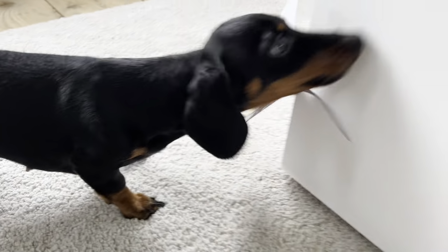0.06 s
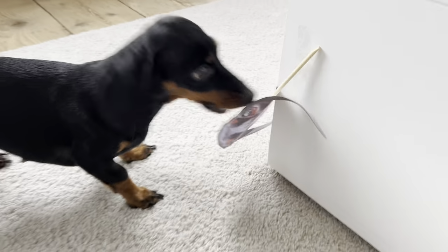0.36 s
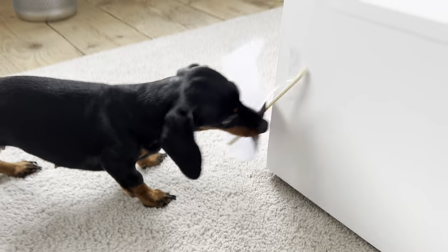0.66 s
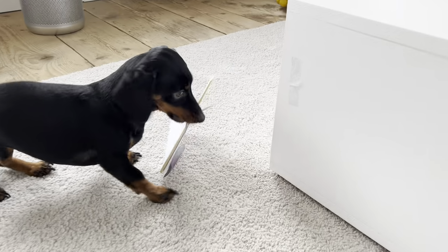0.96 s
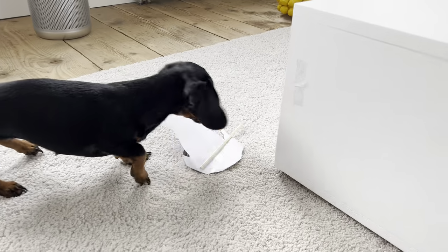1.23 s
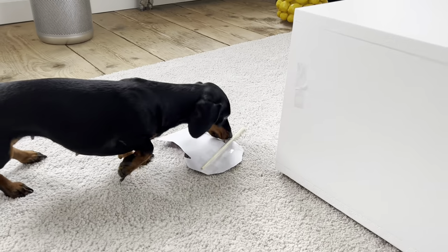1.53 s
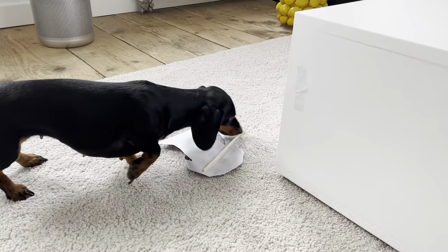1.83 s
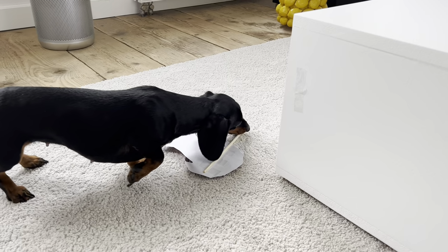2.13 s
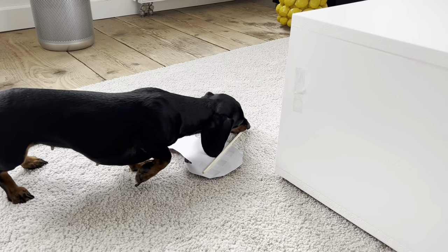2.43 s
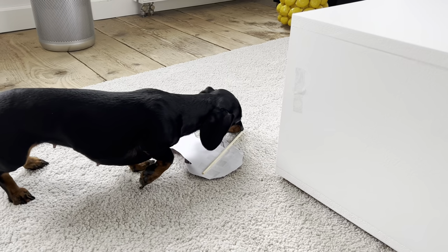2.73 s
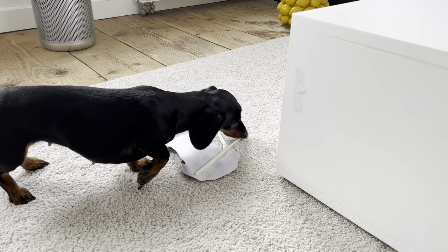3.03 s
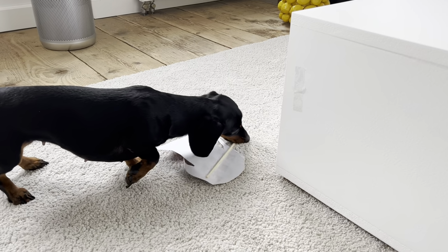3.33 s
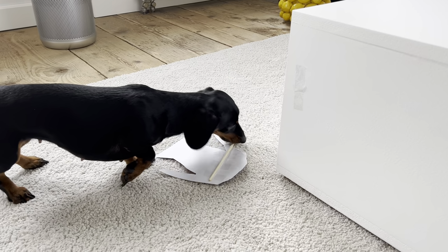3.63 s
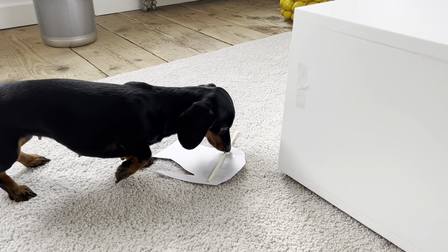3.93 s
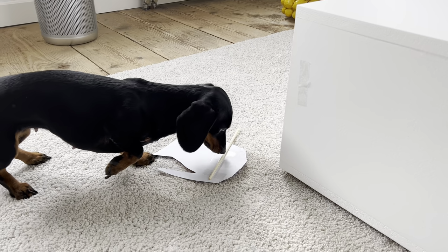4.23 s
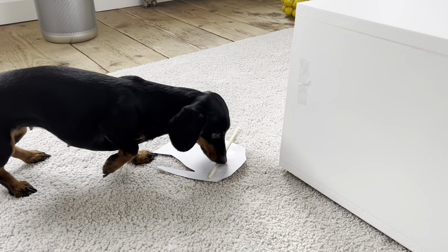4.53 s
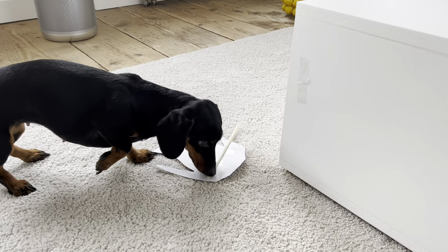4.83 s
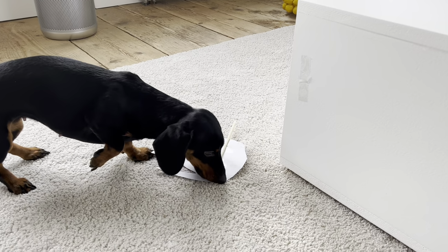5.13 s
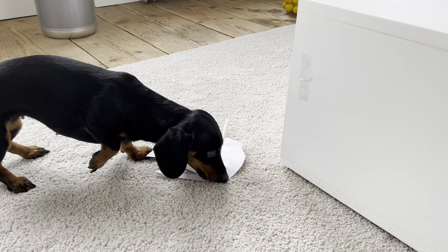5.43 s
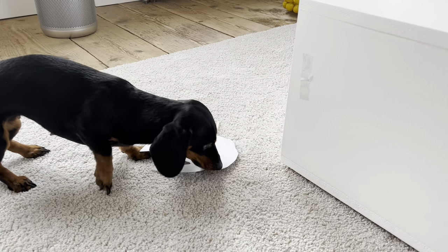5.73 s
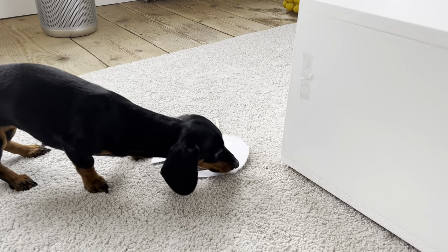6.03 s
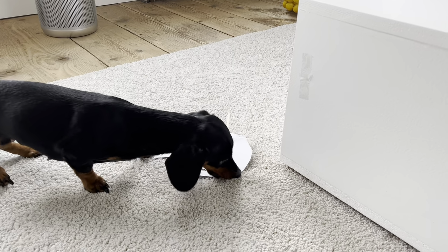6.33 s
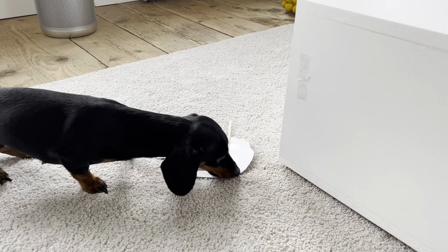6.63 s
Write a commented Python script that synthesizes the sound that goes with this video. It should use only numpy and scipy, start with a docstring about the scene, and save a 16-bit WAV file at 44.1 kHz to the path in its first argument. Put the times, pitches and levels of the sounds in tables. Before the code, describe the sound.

A small dog tugs at a sheet of paper, heard close in a quiet furnished room with a short echo. Paper crinkles and pops from the start, and a dull paw thud lands at about 0.4 seconds. Crackling builds into a short, crisp rip at 0.7 seconds as the sheet comes off a cabinet, with sharp snaps just after. From 1 to 2 seconds the paper flaps and rustles over soft steps on a rug and low shuffling, while claws or teeth tick on the left. Quieter, uneven rustling follows as the dog mouths the sheet, with hollow pops between 3.1 and 3.5 seconds. After a lull, soft nuzzling strokes return around 4.4 to 5.2 seconds, with a few light steps. A tiny tooth click and two louder pops come around 5.4 to 5.7 seconds. Faint rustles and small pops continue until nearly 7 seconds.

```python
"""A small dog steals a sheet of paper

The dog rips the sheet off a cabinet with its teeth, carries it onto a rug and mouths it.
Fibres tear, creases snap, and the paper buckles with hollow pops between the jaws.
It rustles as it flaps, slides and rubs against the muzzle. Claws or teeth tick on the left.
Paws thud on the covered floorboards, and the furnished room adds a short echo."""
import sys
import numpy as np
from scipy import signal
from scipy.fft import rfft, irfft, next_fast_len
from scipy.io import wavfile
from scipy.ndimage import uniform_filter1d, map_coordinates

SR = 44100
rng = np.random.default_rng(int(sys.argv[2]) if len(sys.argv) > 2 else 0)


def file_out(sig):
    """Save sig as 16-bit WAV at sys.argv[1]."""
    # one column per channel
    cols = np.atleast_2d(sig).T
    # limit, then scale
    lim = np.clip(cols, -1, 1)
    pcm = np.round(lim * 32767).astype(np.int16)
    wavfile.write(sys.argv[1], SR, pcm)


N = 302702

# tone colours, or how strong each frequency is: f/Hz, gain/dB
QUIET_COLOUR = [(20, -24.5), (40, -2), (60, -1.5), (105, 0), (160, -13), (340, -11.5), (850, -26),
                (2200, -25), (4000, -40.5), (9000, -34), (10000, -38), (15000, -35.5)]  # the still room
RUMBLE_COLOUR = [(22, -50.5), (40, -13.5), (62, -8.5), (105, 0), (150, -5.5), (220, -11.5), (330, -20),
                 (700, -62.5)]  # the moving dog
BODY_COLOUR = [(110, -37), (220, -2.5), (340, -2), (600, -4.5), (850, -7.5), (1500, -44)]  # low part of the rustle
SHEET_COLOUR = [(400, -36.5), (750, -7.5), (1200, -2.5), (2000, -4.5), (2900, -9), (4500, -18), (8000, -50)]  # middle part of the rustle
HISS_COLOUR = [(1600, -29), (3000, 3), (4200, 3.5), (6200, 6), (7800, 4), (9300, -2), (9900, -14.5),
               (16000, -23.5)]  # high part of the rustle
TEAR_COLOUR = [(300, -16.5), (1000, -12.5), (3000, -0.5), (5000, 3.5), (9000, 3), (12000, 2.5), (16000, 2)]  # breaking fibres
TOP_END_COLOUR = [(9500, -1), (10100, -20.5), (12500, -14), (14000, -15.5), (15200, -8)]  # the treble drops steeply above 9.5 kHz
# how alike the left and right sides are (1 is the same): f/Hz, likeness
STEREO_LIKENESS = [(60, 1), (150, 0.9), (350, 0.7), (900, -0.093), (2500, 0.22), (5000, 0.32),
                   (9000, 0.092)]
# how much louder the left side is: f/Hz, lean/dB
STEREO_LEAN = [(100, 0.2), (600, 1.5), (1200, 0), (2500, 3.5), (4500, 9), (9000, 2.5)]
# only a snap's treble is shaded on the far side: f/Hz, share of the snap's lean
SNAP_SHADOW = [(2200, 0), (4000, 0.75)]
# the room's echo (t60 is the time to fade by 60 dB): f/Hz, t60/s
ROOM_DECAY = [(150, 0.53), (1000, 0.53), (4000, 0.33), (10000, 0.076)]
# the dog shifting its weight and the sheet wagging: t/s, relative level/dB
SHUFFLE_LEVELS = [(0.0, -60), (0.25, -59), (0.4, -56), (0.52, -53), (0.95, -60.5), (1.18, -56.5),
                  (1.58, -53), (1.99, -55.5), (2.1, -62.5), (2.37, -73), (2.65, -70), (3.15, -69),
                  (3.61, -76), (5.04, -76), (5.25, -61), (5.4, -74), (5.62, -69.5), (6.08, -75),
                  (6.55, -76.5), (6.86, -80)]
# soft thuds of paws and body: t/s, level/dB, f/Hz, length/s
PAW_THUDS = [(0.038, -42.5, 176, 0.02), (0.202, -31.5, 270.7, 0.009), (0.228, -42.5, 146, 0.045),
             (0.356, -40.5, 105, 0.059), (0.431, -23, 105, 0.063), (0.43, -30.5, 177, 0.031),
             (0.488, -28, 323, 0.016), (0.495, -33.5, 107, 0.026), (0.668, -35.5, 322, 0.012),
             (0.878, -41, 97, 0.042), (1.03, -50, 182, 0.022), (1.145, -38.5, 118, 0.022),
             (1.426, -38, 91, 0.041), (1.533, -40, 81, 0.057), (1.591, -34.5, 85.5, 0.046),
             (1.663, -37, 114, 0.017), (1.707, -39.5, 112, 0.055), (1.82, -42.5, 187, 0.034),
             (1.965, -44, 171, 0.039), (2.052, -49, 188, 0.038), (2.551, -51, 105, 0.063),
             (2.631, -51.5, 110, 0.05), (3.165, -53, 106, 0.04), (5.071, -40, 251, 0.034),
             (5.092, -59, 232, 0.059), (5.098, -51.5, 336, 0.029), (5.222, -48.5, 119, 0.081),
             (5.638, -52, 306, 0.045), (5.88, -48, 113, 0.039), (6.197, -61.5, 229, 0.033),
             (6.624, -64, 280, 0.019)]
# a click of teeth: t/s, level/dB, f/Hz, t60/s
TOOTH_CLICKS = [(5.4138, -42.5, 5730, 0.0036)]
# faint rustle of the sheet, never quite still between strokes: t/s, level/dB
HANDLING_LEVELS = [(0.0, -57), (0.4, -63.5), (0.53, -59.5), (0.69, -54.5), (0.78, -53), (1.22, -55.5),
                   (3.04, -73.5), (3.32, -64), (3.48, -81), (3.88, -83.5), (4.45, -88.5), (4.57, -77),
                   (5.1, -66), (5.33, -89.5), (5.5, -69.5), (5.64, -65.5), (5.79, -75.5), (6.42, -81.5),
                   (6.86, -88.5)]
# strokes of the sheet flapping, sliding or being nuzzled: t/s, rise/s, hold/s, relative level/dB,
# body boost/dB, hiss boost/dB, air boost on top of the hiss boost/dB, fade/(dB/s)
PAPER_STROKES = [(0.036, 0.0032, 0.0095, -46.5, -6.5, -9.5, 2, 186),
                 (0.144, 0.033, 0.03, -60, 2.5, 1, 5.5, 137), (0.215, 0.0073, 0.032, -56, 6.5, -16, 0, 138),
                 (0.243, 0.06, 0.025, -49.5, -5, -7, 3.5, 480),
                 (0.481, 0.0035, 0.27, -53.5, -4, -5.5, 6, 133),
                 (0.61, 0.034, .03, -47.5, -3.5, -3, 4.5, 128), (0.7, .005, 0.01, -43.5, -2.5, 2.5, 5, 120),
                 (0.793, .015, .01, -50.5, 4.5, -18, 0, 196),
                 (0.853, 0.0036, .013, -47.5, 2.5, 4.5, 4.5, 113),
                 (1.011, 0.011, 0.0061, -44, -6.5, 0.5, 0, 143), (1.151, 0.039, 0.013, -54, -2, 4, 2, 298),
                 (1.21, 0.0061, .0054, -52.5, 6, -2, -2, 224), (1.455, .022, 0.1, -57.5, -11, 4.5, -9, 132),
                 (1.726, .016, .018, -60, -1, 2.5, -8, 120), (1.811, .012, 0.034, -53.5, 1.5, -1, -3, 93),
                 (1.968, 0.015, 0.083, -65, 0.5, 7, -1, 113), (2.134, 0.048, 0.085, -63, 1, 0.5, -2.5, 79),
                 (2.349, 0.031, 0.036, -65, 7, -2, 0, 100), (2.467, 0.02, 0.017, -64, 1, 7, -7, 113),
                 (2.618, 0.024, .015, -66.5, 5.5, -2, 3, 167),
                 (2.748, .0084, 0.06, -66, -16, 3.5, -7.5, 139),
                 (2.944, 0.048, 0.012, -68.5, -16, 5, 0, 226), (3.128, .019, 0.031, -62, -6.5, -1, -13, 92),
                 (3.222, 0.17, .024, -63, -6, 0, 2.5, 187),
                 (3.546, 0.029, 0.049, -80.5, 9, -11.5, 15, 128.5),
                 (3.722, 0.06, 0.035, -65, -6, 4, 1, 476), (4.126, .027, 0.024, -77.5, -8, -8, -8, 218.5),
                 (4.376, 0.033, 0.054, -69.5, -10, 3.5, 1.5, 158.5),
                 (4.52, .016, 0.012, -72, -8, -.5, -17, 87), (4.695, .012, .02, -69.5, -1.5, 4, 1, 115),
                 (4.827, 0.037, 0.017, -59, -6, -7, -21, 157),
                 (4.949, 0.018, 0.039, -63, -8.5, 2, 0.5, 130),
                 (5.103, .012, 0.1, -67, -12, 4.5, -3.5, 132),
                 (5.18, 0.053, 0.048, -63.5, 2.5, -6.5, 3, 108),
                 (5.59, 0.028, 0.018, -55, -17, 3.5, 2.5, 161), (5.857, .029, .014, -71, 5, -12, 2, 122),
                 (6.072, 0.023, .0064, -71, -2, 3.5, 5.5, 303),
                 (6.19, 0.031, 0.024, -79, 4.5, 3, 3.5, 135.5),
                 (6.52, 0.082, 0.036, -69, 0, 1, -2.5, 156.5),
                 (6.758, 0.026, 0.016, -75.5, -16, 7.5, -11, 131)]
# the modes (natural tones) of a buckling patch of paper: multiple of the pop's f, level/dB
PANEL_MODES = [(0.55, 4.5), (0.78, 11.5), (1.06, 15.5), (1.6, 3.5), (2.1, 11.5), (2.5, 10.5)]
# hollow pops between the jaws: t/s, level/dB, f/Hz, t60 at f/s, crack level/dB, shiver over pop/dB
BUCKLE_POPS = [(0.0388, -39, 1650, .022, -52, -11), (0.1174, -42, 1400, .026, -53, -22),
               (0.2254, -33, 1080, .027, -46, -22), (0.7967, -38.5, 1450, .01, -48, -14),
               (0.8138, -43, 1500, .01, -55, -12), (1.2212, -43.5, 1550, .014, -52, -12),
               (1.2318, -44.5, 1300, .01, -56, -12), (3.1186, -42, 1340, .022, -54, -14),
               (3.1555, -56, 1500, .012, -60, -14), (3.1599, -53.5, 1400, .012, -56, -14),
               (3.2618, -45, 820, .004, -48, -24), (3.2632, -49, 1350, .005, -53, -20),
               (3.4451, -56, 2300, .018, -68, -16), (3.4548, -51, 1450, .018, -68, -17),
               (5.4572, -38.5, 930, .012, -57, -12), (5.468, -47, 1500, .012, -63, -12),
               (5.478, -52, 2050, .01, -66, -12), (5.6469, -32.5, 930, .012, -53, -13),
               (5.6625, -46, 1500, .012, -60, -12), (6.0095, -53.5, 1250, .014, -55, -20),
               (6.1844, -63.5, 850, .03, -79, -12), (6.198, -65, 950, .015, -76, -12),
               (6.3565, -60.5, 1030, .012, -64, -13), (6.3697, -64, 1020, .013, -70, -12),
               (6.6056, -48, 900, .017, -58, -11), (6.645, -58, 950, .016, -66, -12)]
# sharp snaps and ticks: paper creases, and dry claw or tooth ticks on the left:
# t/s, relative level/dB, f/Hz, t60/s, sharpness Q, top octave/dB, lean/dB
SNAPS_AND_TICKS = [(0.0386, -38, 3900, .018, 1.1, -10, 2), (0.1168, -44.5, 5500, .018, .8, 3, 3),
                   (0.2004, -41.5, 3000, .018, .5, -3, 5), (0.2253, -34, 2500, .011, 1, -13, 3),
                   (0.4895, -49, 4500, .028, 1, -8, 6), (0.5768, -38, 10000, .012, .6, 6, 6),
                   (0.5992, -33.5, 3200, .011, .9, 3, 4), (0.6481, -32, 5100, .011, 1.2, -5, 7),
                   (0.6629, -31, 3100, .014, 1.1, -3, 7), (0.6745, -41, 4300, .009, 1, -3, 3),
                   (0.6886, -29.5, 8800, .011, 1, 10, 4), (0.6895, -37, 5000, .008, 2, -3, 5),
                   (0.7062, -37, 6500, .005, 1, 2, 5), (0.7098, -33, 6300, .018, 1, 2, 6),
                   (0.7198, -35.5, 7200, .008, 1.2, 0, 4), (0.7242, -31.5, 8000, .01, 1.3, 0, 4),
                   (0.7299, -24.5, 4200, .008, 1.8, 6, 2), (0.7305, -22, 6000, .007, 1.3, 10, 5),
                   (0.8574, -24.5, 6200, .011, .7, 7, 5), (0.8599, -24, 8000, .011, .9, 4, 1),
                   (0.8715, -35.5, 6500, .018, .9, 5, 2), (0.9523, -34, 6600, .016, 1, -1, 7),
                   (0.9695, -42.5, 5500, .022, .8, -10, 6), (0.9956, -41.5, 5300, .016, 1.2, -6, 10),
                   (1.0245, -40, 8000, .02, 1.3, -10, 6), (1.0275, -31.5, 7600, .045, 1.8, -10, 6),
                   (1.1324, -38, 6000, .018, 1.2, -1, 8), (1.1892, -44, 3600, .014, 1.8, -10, 5),
                   (1.3114, -38, 5900, .026, 1.9, -25, 15), (1.386, -44.5, 5800, .016, 1.8, -25, 14),
                   (1.4076, -46.5, 5700, .014, 1.7, -25, 13), (1.4765, -48, 5700, .02, 1.7, -25, 12),
                   (1.4818, -44, 5800, .022, 1.8, -25, 15), (1.5425, -51.5, 5000, .01, 2.5, -25, 12),
                   (1.5595, -51, 6500, .012, 1.5, -20, 10), (1.656, -55.5, 6000, .012, 2, -25, 10),
                   (1.7251, -47.5, 6000, .015, 2, -25, 16), (1.7405, -55, 6200, .012, 2, -25, 12),
                   (1.8103, -51, 5300, .01, 1, -20, 15), (1.8925, -53, 3500, .012, 1, -20, 6),
                   (1.9149, -52, 3000, .014, 1.2, -20, 6), (1.978, -54.5, 6300, .015, 1.5, -20, 12),
                   (1.9903, -51, 6450, .022, 2.2, -25, 12), (2.2315, -60, 6300, .014, 1.3, -20, 8),
                   (2.365, -61, 5200, .025, 1.8, -20, 8), (2.4732, -57.5, 6480, .016, 2, -20, 8),
                   (2.7525, -61, 3600, .014, 1.2, -20, 6)]
# fibres parting as the sheet comes off: t/s, level/dB
RIP_LEVELS = [(0.62, -69), (0.706, -55), (0.717, -34.5), (0.726, -38.5), (0.738, -46.5), (0.76, -61.5),
              (0.80, -120)]


def amp(db):
    """Turn decibels into a gain to multiply by."""
    return 10 ** (np.asarray(db) / 20)


def unit(x):
    """Scale x to an average strength (rms) of 1."""
    return x / np.sqrt(np.mean(x ** 2) + 1e-20)


def unit_hit(x):
    """Scale x so that its loudest two milliseconds have rms 1."""
    power = uniform_filter1d(np.atleast_2d(x) ** 2, size=88, axis=-1).mean(0)
    return x / np.sqrt(power.max())


def along(points, hz):
    """Read a (frequency, value) table at hz, on a log frequency scale."""
    f, values = np.transpose(points)
    return np.interp(np.log(hz + 1), np.log(f + 1), values)


def timeline(points):
    """Join (time, value) points into one value per sample."""
    return np.interp(np.arange(N) / SR, *np.transpose(points))


def wobble(rate):
    """A smooth random curve through `rate` points a second."""
    return map_coordinates(rng.standard_normal(int(N * rate / SR) + 4), [np.arange(N) * rate / SR])


def filtered(x, response):
    """Give each frequency in x the gain that response(hz) asks for."""
    n = x.shape[-1]
    padded = next_fast_len(n + 4096)
    return irfft(rfft(x, padded) * response(np.fft.rfftfreq(padded, 1 / SR)), padded)[..., :n]


def resonate(x, hz, q):
    """Pass x through one resonance; a higher q makes it narrower."""
    return filtered(x, lambda f: 1j * f * hz / q / (hz * hz - f * f + 1j * f * hz / q))


def add(track, start, sound, pan_db=0):
    """Mix a sound into a stereo track at `start` seconds; positive pan_db leans left."""
    part = track[:, max(round(start * SR), 0):][:, :sound.shape[-1]]
    part += (sound * amp([[pan_db / 2], [-pan_db / 2]]))[:, :part.shape[1]]


def spread(pair, colour):
    """Blend two unrelated signals into one coloured stereo sound of rms 1, near mono in the bass."""
    def blend(hz):
        angle = np.arccos(np.clip(along(STEREO_LIKENESS, hz), -1, 1)) / 2
        return amp(along(colour, hz)) * [np.cos(angle), np.sin(angle)]
    mid, side = filtered(pair, blend)
    stereo = np.array([mid + side, mid - side])
    return unit(filtered(stereo, lambda hz: amp(np.outer([.5, -.5], along(STEREO_LEAN, hz)))))


def background():
    """The faint, steady noise of the room."""
    return amp(-73.5) * spread(rng.standard_normal((2, N)), QUIET_COLOUR)


def room_echo(x):
    """The walls return a blurred echo whose high notes die first."""
    hz, t, noise = signal.stft(rng.standard_normal((2, SR // 2)), SR, nperseg=256)
    tail = signal.istft(noise * amp(-60 * t / along(ROOM_DECAY, hz)[:, None]), SR, nperseg=256)[1]
    tail = np.pad(tail / np.linalg.norm(tail[0]), ((0, 0), (int(0.005 * SR), 0)))
    return signal.fftconvolve(x.mean(0)[None], tail, axes=1)[:, :N]


def with_reflections(x, strength):
    """The cabinet and nearby walls add a few weak copies of x within about 30 ms."""
    paths = np.zeros((2, SR // 32))
    paths[:, 0] = 1  # the direct sound
    for side in paths:
        side[rng.integers(SR // 400, len(side), size=10)] = strength * rng.uniform(-1.0, 1, size=10)
    return signal.fftconvolve(x, paths / np.linalg.norm(paths, axis=1, keepdims=True), axes=1)[:, :N]


def shuffle():
    """The moving dog and the wagging sheet make a low, uneven rumble."""
    level_db = timeline(SHUFFLE_LEVELS) + 4 + 2.6 * wobble(rate=22)
    return amp(level_db) * spread(rng.standard_normal((2, N)), RUMBLE_COLOUR)


def thuds():
    """Each padded contact swells for a few cycles of a low tone, then scuffs on the rug."""
    out, t = np.zeros((2, N)), np.arange(SR // 5) / SR
    for start, db, hz, length in PAW_THUDS:
        progress = np.minimum(t / length, 1)
        push = np.sin(np.pi * progress) ** 2 * np.sin(2 * np.pi * hz * t)
        dull_hz = min(hz, 150)  # the scuff stays dull however high the thud
        drag = resonate(rng.standard_normal(len(t)), 1.7 * dull_hz, q=1.9)
        drag = unit(resonate(drag, 1.4 * dull_hz, q=0.95))
        scuff = drag * progress ** 2 * amp(-60 * np.maximum(t - length, 0) / 0.14)
        scuff_db = min(db - 16, -53)
        add(out, start, amp(db) * push + amp(scuff_db) * scuff, pan_db=1.8)
    return out


def tooth_click():
    """Tooth touches tooth: a very short, high ring, with a weaker tone from the jaw."""
    out, t = np.zeros((2, N)), np.arange(SR // 50) / SR
    for start, db, hz, t60 in TOOTH_CLICKS:
        ring = resonate(amp(-60 * t / t60) * np.sin(2 * np.pi * hz * t), hz, q=4.9)
        jaw = 0.18 * amp(-60 * t / 0.0092) * np.sin(2 * np.pi * 2300 * t)
        add(out, start, amp(db) * (ring / np.abs(ring).max() + jaw), pan_db=11.0)
    return out


def friction():
    """Rubbing noise whose colour shifts at random, as when a sheet bends."""
    noise = signal.stft(rng.standard_normal((2, N)), nperseg=512)[2]
    patches = uniform_filter1d(rng.standard_normal(noise.shape[1:]), size=4, axis=0)  # over frequency
    patches = uniform_filter1d(patches, size=7, axis=1)  # over time
    return unit(signal.istft(noise * amp(2.9 * unit(patches)), nperseg=512)[1][:, :N])


def fibre_slips(rate, scatter_db):
    """Fibres slip in tiny ticks of random size, about `rate` times a second."""
    sizes = amp(scatter_db * np.clip(rng.standard_normal(N), -2, 2))
    slipping = rng.random(N) < rate / SR
    return unit(sizes * slipping * rng.standard_normal((2, N)))


def stroke_levels():
    """Levels of body, sheet, hiss and air in dB: strokes rise, hold and fade over gentle handling."""
    handling_colour_db = [[-5], [0], [-2.5], [-6]]
    power = amp(timeline(HANDLING_LEVELS) + handling_colour_db) ** 2
    power[0] += amp(timeline(SHUFFLE_LEVELS) - 6.5) ** 2  # paws brushing the rug
    t = np.arange(SR * 2 // 3) / SR
    for start, rise, hold, db, body_db, hiss_db, air_db, fade in PAPER_STROKES:
        swell = np.sin(np.pi / 2 * np.minimum(t / rise, 1)) ** 2
        shape = swell * amp(-fade * np.maximum(t - rise - hold, 0))
        bands = amp(db + np.array([body_db, 0, hiss_db, hiss_db + air_db]))
        part = power[:, round(start * SR):][:, :len(t)]
        part += np.outer(bands, shape[:part.shape[1]]) ** 2
    return 10 * np.log10(power)


def rustle():
    """Paper rubs on rug and muzzle: a soft body, a grainy middle, a hiss and, highest of all, air."""
    air_hz, sparkle_hz = 6860, 10500
    body_db, sheet_db, hiss_db, air_db = stroke_levels()
    catching_db = 0.9 * wobble(rate=45)
    slips = fibre_slips(rate=1300, scatter_db=6.5)
    body = amp(body_db + 1.0 + catching_db) * spread(friction(), BODY_COLOUR)
    sheet = amp(sheet_db + 0.89 + catching_db) * spread(friction() + 0.11 * slips, SHEET_COLOUR)
    treble = amp(catching_db - 2.0) * spread(friction() + 0.12 * slips, HISS_COLOUR)
    air = filtered(treble, lambda hz: 1 / (1 + (air_hz / (hz + 1)) ** 12))
    hiss = amp(hiss_db) * (treble - air) + amp(air_db) * air
    sparkle_db = 3.5 + 2.2 * (air_db - hiss_db)  # airy strokes open up the top octave
    sparkle = amp(sparkle_db) * filtered(hiss, lambda hz: hz > sparkle_hz)
    return with_reflections(body + sheet + hiss + sparkle, strength=0.18)


def pops():
    """Paper buckles: its modes ring briefly under a thin crack, then shiver on at the same pitches."""
    shiver_rise_s, shiver_t60_s = .006, .18
    out, t = np.zeros((2, N)), np.arange(SR // 4) / SR
    for start, db, hz, t60, crack_db, shiver_db in BUCKLE_POPS:
        ring = np.zeros(len(t))
        # neighbouring modes swing opposite ways, so the ring takes a cycle to build and has no bass
        for k, (ratio, mode_db) in enumerate(PANEL_MODES):
            decay = amp(mode_db + rng.normal(0, 1.0) - 60 * t * ratio / t60)
            ring += (-1) ** k * decay * np.sin(2 * np.pi * hz * ratio * t)
        ring = resonate(ring, hz, q=0.9)
        crack = rng.standard_normal((2, len(t))) * amp(-60 * t / 0.015)
        crack = resonate(resonate(crack, 3800, q=1.0), 4000, q=0.6)
        crack = filtered(crack, lambda f: amp(along([(8000, 0), (11000, -15)], f)))
        noise = rng.standard_normal((2, len(t)))
        shiver = unit(signal.fftconvolve(noise, ring[None], axes=1)[:, :len(t)])
        shiver *= amp(shiver_db - 60 * t / shiver_t60_s) * (1 - np.exp(-t / shiver_rise_s))
        add(out, start, amp(db) * (unit_hit(ring) + shiver))
        add(out, start, amp(crack_db) * unit_hit(crack), pan_db=-0.5)
    return out


def snaps_and_ticks():
    """A paper crease snaps, or a claw or tooth ticks: a burst of tiny cracks over a lower knock."""
    out, t = np.zeros((2, N)), np.arange(SR // 12) / SR
    swell = 1 - np.exp(-t / 0.0005)
    for start, db, hz, t60, q, top_db, lean_db in SNAPS_AND_TICKS:
        shared, left, right, knock_noise = rng.standard_normal((4, len(t)))
        cracks = (shared + 0.55 * np.array([left, right])) * swell * amp(-60 * t / t60)
        cracks = resonate(resonate(cracks, hz, q=q), hz, q=q)
        cracks = unit_hit(filtered(cracks, lambda f: amp(along([(8700, 0), (11000, top_db)], f))))
        cracks = filtered(cracks, lambda f: amp(lean_db * np.outer([.5, -.5], along(SNAP_SHADOW, f))))
        knock = knock_noise * swell * amp(-60 * t / 0.024)
        knock = resonate(resonate(knock, 2400, q=1.0), 1900, q=0.75)
        knock_db = -49.5 + .65 * (db + 38)  # louder snaps knock harder
        add(out, start, amp(db - 2.5) * cracks)
        add(out, start, amp(knock_db) * unit_hit(knock))
    return out


def rip():
    """Fibres break in clumps, in a swelling run until the sheet comes free."""
    pulling = np.arange(N) / SR > RIP_LEVELS[0][0]
    clumps_db = 2.5 * wobble(rate=170)
    fibres = spread(fibre_slips(rate=14000, scatter_db=1.5), TEAR_COLOUR)
    return amp(timeline(RIP_LEVELS) + clumps_db) * pulling * fibres


def scene():
    """Mix the dog and the paper with the room's echo and quiet background."""
    cracks, buckles, steps = snaps_and_ticks() + rip(), pops(), thuds()
    echo = room_echo(amp(-8) * cracks + amp(-8.5) * buckles + amp(-25.5) * steps)
    return background() + echo + steps + tooth_click() + rustle() + shuffle() + buckles + cracks


def record(dry):
    """The treble drops steeply above 9.5 kHz and stops at about 16 kHz."""
    top_hz = 16100
    return filtered(dry, lambda hz: amp(along(TOP_END_COLOUR, hz)) * (hz < top_hz))


dry = scene()
out = record(dry)
file_out(out)
```